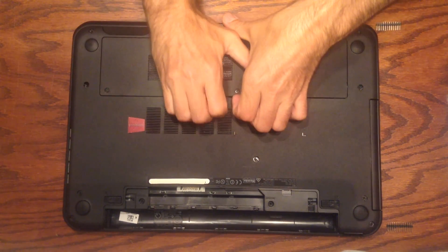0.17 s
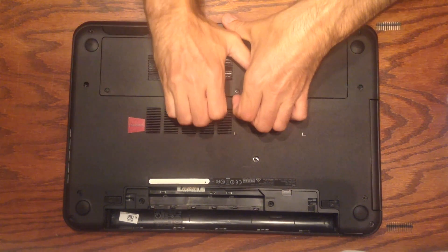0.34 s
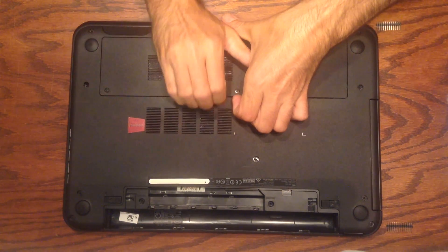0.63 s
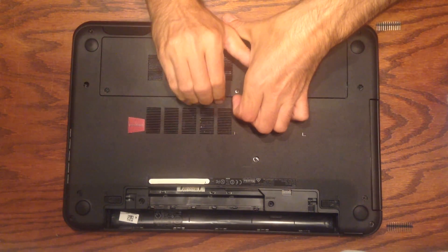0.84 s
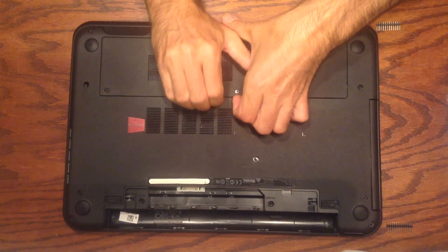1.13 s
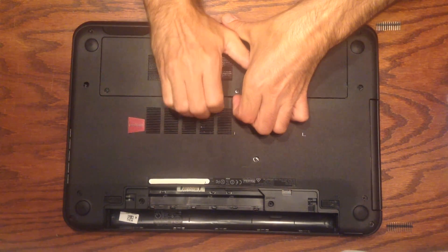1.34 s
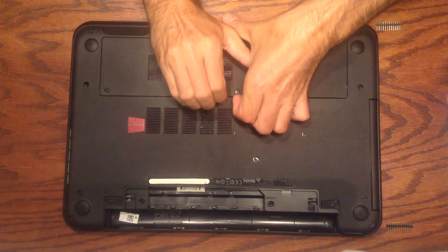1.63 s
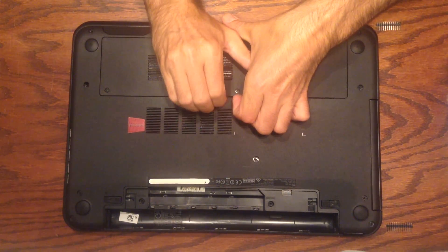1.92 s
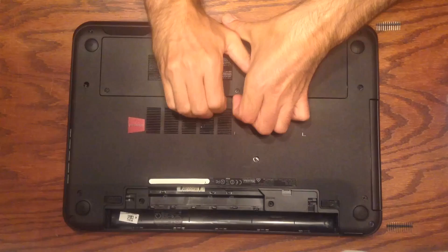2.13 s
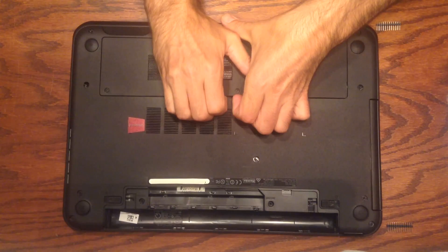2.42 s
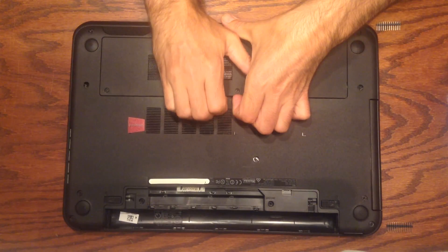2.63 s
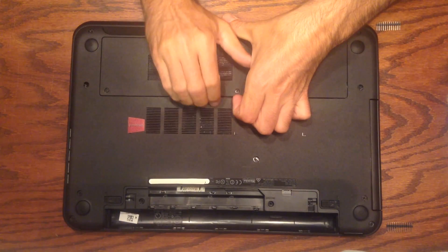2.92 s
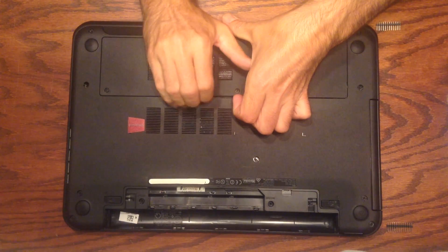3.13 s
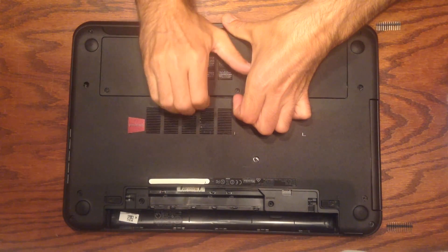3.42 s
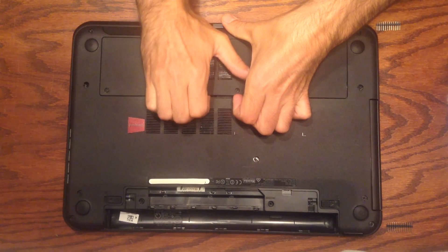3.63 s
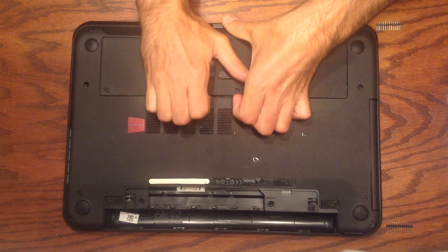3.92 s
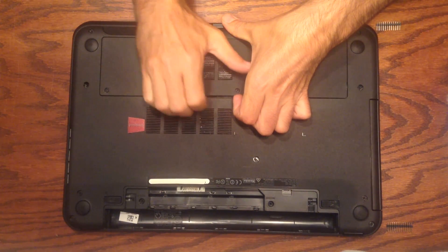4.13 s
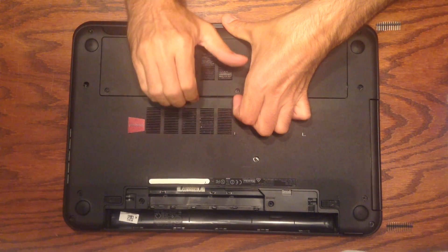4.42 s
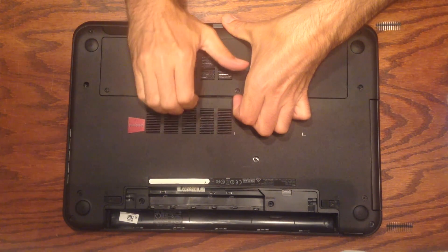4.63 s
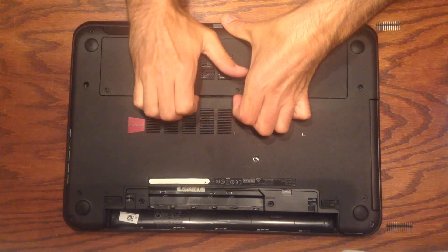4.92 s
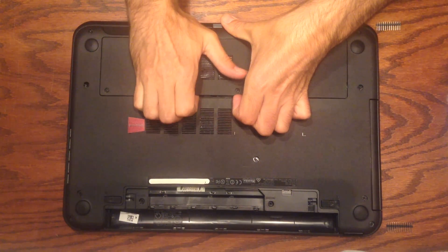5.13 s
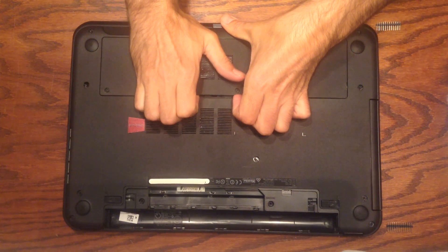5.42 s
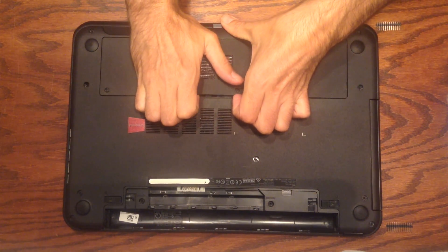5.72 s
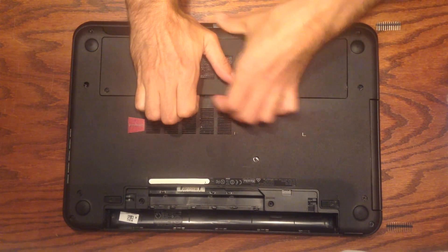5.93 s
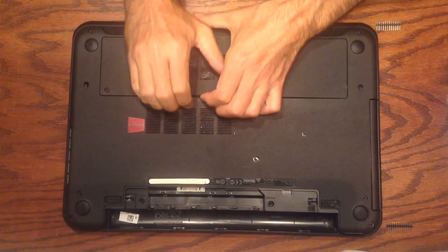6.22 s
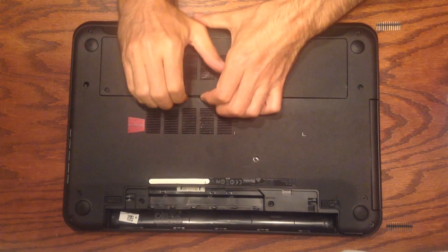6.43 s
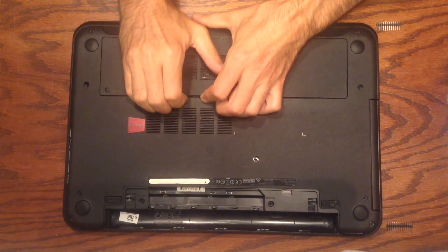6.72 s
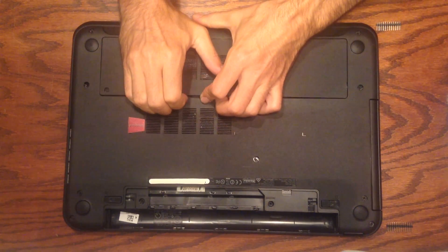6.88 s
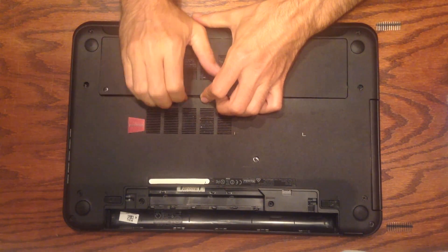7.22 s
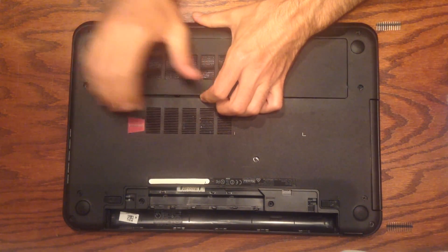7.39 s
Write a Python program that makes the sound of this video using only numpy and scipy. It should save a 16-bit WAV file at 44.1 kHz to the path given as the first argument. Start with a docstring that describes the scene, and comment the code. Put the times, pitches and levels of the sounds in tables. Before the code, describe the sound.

A close microphone in a small quiet room catches fingers prying a plastic panel off a laptop. From 0 to 0.4 s come tiny ticks and soft, buzzing fingertip judders; from 0.5 to 1.9 s, scrapes and light knocks, with a firmer click and tiny squeak at 1.1 s. At 2.25 s a clip snaps with a loud, hollow, rattling pop, a dull rebound and short room echo. Clicks and scratchy strokes follow at 2.7 to 3.5 s, then faint rubs, ticks and a judder around 3.9 to 4.6 s. It is nearly still until about 5.9 s, when scraping resumes, with a clear tick at 6.4 s. A second, brighter snap cracks at 6.84 s; a last knock and faint rub come at 7.2 s. Throughout are faint low-mid room noise, a wavering hum, a thin sinking whine, and a high insect trill with sparse chirps.

```python
"""Prying a plastic panel loose

Fingers pry a plastic service panel off the underside of a laptop on a wooden table in a small room.
Nails tick, squeak and scrape along the seam (filtered bursts and grains); fingertips judder (pulse trains).
Two clips snap loose with sharp pops; after each snap and tick the panel falls back with a knock.
Behind are room noise (coloured noise), a wavering hum, a thin sinking whine (sines) and an insect trill
(a swinging tone with hiss) with a few chirps (swells of noise)."""
import sys
import numpy as np
from scipy import signal
from scipy.fft import rfft, irfft, next_fast_len
from scipy.io import wavfile
from scipy.ndimage import uniform_filter1d

SR = 44100
rng = np.random.default_rng(int(sys.argv[2]) if len(sys.argv) > 2 else 0)


def put_to_file(sound):
    """Save the sound as 16-bit audio at rate SR, in the file named by the first command-line argument."""
    columns = np.atleast_2d(sound).T  # one column per channel
    safe = np.clip(columns, -1, 1)
    whole_steps = np.round(safe * 32767)
    wavfile.write(sys.argv[1], SR, whole_steps.astype(np.int16))


N = 332955
TIME = np.arange(N) / SR   # s

# spectrum of the room noise: (frequency [Hz], level [dB])
ROOM_NOISE_SPECTRUM = [(25, -46.5), (60, -27.5), (100, -13), (150, -1), (230, 1), (330, -5), (500, -6),
                       (800, -8.5), (1200, -12.5), (2000, -19.5), (4000, -22), (8000, -22), (13000, -21.5),
                       (15500, -27)]
# level of the whine before its waver: (time [s], level [dB])
WHINE_LEVEL = [(0, -75.5), (2.8, -79), (3.698, -70.5), (4.702, -79.5), (5.8, -69), (6.7, -73), (7.55, -67)]
# spectrum of the hiss in the insect trill: (frequency [Hz], level [dB])
TRILL_SPECTRUM = [(5000, -40.5), (6400, -18), (6850, -4.5), (7200, -2.5), (7400, -3.5), (7600, 2.5),
                  (7800, -8.5), (8100, -16), (9000, -39.5)]
# high chirps: (time [s], centre frequency [Hz], level [dB])
CHIRP_EVENTS = [(1.46, 6800, -60.5), (2.87, 3830, -68), (2.989, 6600, -61), (4.24, 6900, -60),
                (5.18, 6430, -61), (7.11, 6800, -59.5)]
# finger strokes along the seam:
# (start [s], length [s], scrape level [dB], scrape treble tilt [dB], skin rub level [dB])
STROKES = [(0, 0.038, -57.5, -13, -58.5), (0.478, 0.23, -57, -4.5, -72), (.88, .13, -63.5, -4, -64),
           (1.075, 0.014, -46, -7, -55), (1.301, 0.12, -60, -2.5, -73), (1.516, 0.097, -62.5, -4, -68),
           (1.725, 0.041, -59, -2.5, -71), (1.837, .08, -60, -18, -66.5), (2.705, .05, -65.5, 3, -63),
           (2.764, 0.043, -54, 2, -61), (3.071, 0.015, -59, -2, -77), (3.127, 0.066, -51.5, 0, -66),
           (3.241, 0.079, -55.5, -10, -61), (3.369, 0.18, -65.5, -17.5, -61.5),
           (3.949, 0.057, -71, -4, -68.5), (4.105, 0.101, -61, -3, -65.5), (4.213, 0.039, -52.5, -3.5, -69),
           (4.573, 0.045, -55, -20, -60), (5.866, .15, -58, 4, -64), (6.137, 0.047, -52.5, -1.5, -70.5),
           (6.299, 0.03, -53.5, -0.5, -65), (6.425, 0.088, -58.5, -5, -70), (7.22, 0.11, -69, -11, -71)]
# spectrum of the nail scrape: (frequency [Hz], level [dB])
SCRAPE_SPECTRUM = [(150, -25), (300, -6.5), (550, -2.5), (800, 3.5), (1350, 1.5), (1900, -6.5), (3300, -10),
                   (5000, -13), (8000, -16.5), (15000, -22.5)]
# spectrum of the skin rub: (frequency [Hz], level [dB])
RUB_SPECTRUM = [(30, -24.5), (90, -20.5), (150, 5.5), (220, 0.5), (330, -4.5), (500, -19.5), (900, -37)]
# nails and panel edge knocking on the case:
# (time [s], strength [dB], treble tilt [dB], contact ring [Hz], rebound relative to the tick [dB])
TICK_EVENTS = [(0.041, -29, -8, 1400, -15), (0.057, -25.5, -5, 1220, -11), (0.557, -22, -17, 1460, -9),
               (0.615, -25, -40, 2000, -14), (0.713, -23.5, -18, 1900, -8), (0.924, -24.5, -2, 1190, 1),
               (0.967, -33, -10, 1390, -2), (0.994, -33.5, -18, 1280, -14), (1.038, -25, -19, 1570, -3),
               (1.086, -11.5, -3.5, 2260, -3.5), (1.09, -15, -3, 1560, 2.5), (1.23, -31.5, -30, 895, 4),
               (1.522, -24.5, -46, 1660, -3.5), (1.723, -17.5, -1.5, 1410, -22),
               (1.848, -22.5, -27.5, 1480, -19), (2.25, -6, -4.5, 760, -13), (2.754, -13.5, -4.5, 1150, -4),
               (3.248, -15.5, -4.5, 1150, -11), (3.279, -22, -9, 1720, -5), (3.867, -35, -2, 1440, -6),
               (4.14, -24.5, -28, 1280, 0.5), (4.369, -31, 0, 864, 3), (4.543, -24, -24, 3230, -0.5),
               (4.583, -24.5, -9, 3330, -10), (5.965, -26, -7, 1280, -8), (6.151, -33, -7, 907, -16),
               (6.309, -22.5, -3, 1270, -18), (6.416, -13, -4, 2970, -9.5), (6.603, -25, -16.5, 1250, 0.5),
               (7.184, -28.5, -17, 1090, 4.5), (7.205, -11, -7, 1030, -1.5)]
# spectrum of a knock: (frequency [Hz], level [dB])
KNOCK_SPECTRUM = [(40, -29.5), (100, -17.5), (160, 0.5), (300, 4.5), (500, -2), (800, 2.5), (1300, 3.5),
                  (2100, -2), (3400, -3.5), (4500, -6), (8000, -6.5), (15000, -18.5)]
# fingertips sticking and slipping: (time [s], length [s], mean slip rate [1/s], strength [dB])
JUDDER_EVENTS = [(0.16, 0.1, 122, -7.5), (0.33, 0.046, 179, -9.5), (3.866, 0.04, 130, -10.5),
                 (5.11, 0.035, 130, -23.5), (5.287, 0.05, 132, -24.5)]
# spectrum of the slips: (frequency [Hz], level [dB])
JUDDER_SPECTRUM = [(30, -16), (90, -7.5), (150, 3), (220, -1), (330, -11.5), (500, -20), (900, -37)]
# nails squeaking on the plastic: (time [s], length [s], pitch [Hz], level [dB])
SQUEAK_EVENTS = [(1.079, 0.014, 5400, -48), (3.133, 0.026, 5000, -55), (3.972, 0.026, 5720, -65),
                 (4.574, 0.048, 3260, -62)]
# clips letting go: (time [s], strength [dB], rattle relative to the crack [dB],
# send to the room relative to the strength [dB], rebound relative to the snap [dB])
SNAP_EVENTS = [(2.2475, 8.5, 3, -5.5, -17), (6.8407, 7.5, -4.5, -2.5, -16.5)]
# spectrum of each clip in turn: (frequency [Hz], level [dB])
SNAP_SPECTRA = [
    [(40, -35.5), (100, -28.5), (160, -11.5), (400, -10.5), (540, -7.5), (780, -0.5), (1250, -3),
     (1800, -3), (2250, -1.5), (2900, -7.5), (5000, -8), (8500, -13), (12000, -14), (15500, -17)],
    [(40, -43.5), (100, -42), (160, -12.5), (400, -11), (550, -13), (780, -6.5), (1250, 2), (1850, -2),
     (2700, -1), (5000, -4), (9000, -8), (13000, -10), (15500, -11)],
]
# resonances of the panel: (frequency [Hz], width [Hz], level [dB])
PANEL_MODES = [(156, 16, -1), (210, 12, 6.5), (327, 16, -1.5), (386, 18, 3.5), (590.4, 12, 8),
               (653, 18, -8.5), (760, 56, 4.5), (880, 8.3, -10), (1095, 3.8, -5.5), (1187, 18, -4),
               (1270, 18, 1), (1640, 19, -10.5)]
# decay of the room by 60 dB: (frequency [Hz], decay time [s])
ROOM_DECAY = [(100, .55), (800, 0.45), (2000, 0.46), (5000, 0.44), (12000, 0.39)]

WHINE_HZ, WHINE_HALVING_S = 1093, 18.4   # starting pitch, time for the pitch to fall to half
PRESS_SHARE, LET_GO_S = .25, .03   # share of a stroke spent pressing in; release time after it
HITCH_GAP_S, HITCH_HZ = .04, 1450   # mean gap, middle of the contact ring
HITCH_DB, HITCH_SPREAD_DB = -37, 2.5
TICK_REBOUND_S, TICK_REBOUND_HZ = .009, 220   # delay, contact ring
SNAP_REBOUND_S, SNAP_REBOUND_HZ = .0175, 385
CUTOFF_HZ = 15600


def from_db(db):
    """Logarithmic level: decibels to amplitude gain."""
    return 10 ** (np.asarray(db) / 20)


def rms_one(x):
    """Power normalisation: scale to rms 1."""
    return x / np.sqrt(np.mean(x ** 2) + 1e-20)


def unit_energy(x):
    """Energy normalisation: scale to the energy of a unit click."""
    return x / np.sqrt(np.sum(x ** 2) + 1e-20)


def at_hz(points, hz):
    """Logarithmic pitch scale: read a table on a log-frequency axis."""
    points = np.array(points)
    return np.interp(np.log(np.maximum(hz, 1)), np.log(points[:, 0]), points[:, 1])


def add(track, s, sound):
    """Superposition: mix a sound into a track at a time."""
    start = max(round(s * SR), 0)
    track[..., start:start + sound.shape[-1]] += sound[..., :N - start]


def coloured(x, spectrum):
    """Minimum-phase filtering: a causal response with the given spectrum, by folding its cepstrum."""
    size = 2 * next_fast_len(len(x) // 2 + 1)
    level_db = at_hz(spectrum, np.fft.rfftfreq(size, 1 / SR))
    cepstrum = irfft(np.log(from_db(level_db)))
    cepstrum[1:size // 2] *= 2
    cepstrum[size // 2 + 1:] = 0
    response = np.exp(rfft(cepstrum))
    return irfft(rfft(x, size) * response)[:len(x)]


def tilted(x, thud_db, edge_db):
    """Spectral tilt: raise or lower the bass and the treble."""
    return coloured(x, [(300, thud_db), (700, 0.0059), (3000, 0), (6000, edge_db)])


def evened(x):
    """Spectral whitening: level the broad humps and dips of a short burst."""
    power = uniform_filter1d(np.abs(rfft(x)) ** 2, size=len(x) // 200)
    correction_db = 10 * np.log10(power.mean() / power)
    hz = np.fft.rfftfreq(len(x), 1 / SR)
    return coloured(x, np.column_stack([hz, correction_db])[1:])


def noise(spectrum):
    """Stationary random noise of the given spectrum and rms 1."""
    return rms_one(coloured(rng.standard_normal(N), spectrum))


def drift(rate):
    """Slow random modulation of rms 1, with a new value drawn rate times a second."""
    return rms_one(np.interp(TIME * rate, np.arange(N), rng.standard_normal(N)))


def resonate(x, hz, width_hz):
    """Damped resonance: a two-pole filter with gain 1 at its peak."""
    r = np.exp(-np.pi * width_hz / SR)
    zeros = np.array([1, 0, -1]) * (1 - r * r) / 2
    poles = [1, -2 * r * np.cos(2 * np.pi * hz / SR), r * r]
    return signal.lfilter(zeros, poles, np.asarray(x) + 1e-18)


def blow(crack_t60, rattle_t60, rattle_db, click_db, travel_s, size=8192):
    """Impact and dispersion: click, crack and longer shell rattle; bending waves bring the treble first."""
    t, hz = TIME[:size], np.fft.rfftfreq(size, 1 / SR)
    crack = unit_energy(rng.standard_normal(size) * from_db(-60 * t / crack_t60))
    rattle = unit_energy(rng.standard_normal(size) * from_db(-60 * t / rattle_t60))
    wave = evened(from_db(click_db) * (t == 0) + crack) + from_db(rattle_db) * rattle
    lag = 4 * np.pi * travel_s * np.sqrt(1000 * hz)   # phase; the delay at 1 kHz is travel_s
    return irfft(rfft(wave) * np.exp(-1j * lag))


def knock(db, thud_db, edge_db, hz, ring_db=9, ring_width=.17, overtone=2.1, overtone_db=3.0, room_db=-9):
    """Contact resonance: a small blow with ring, overtone, thud and edge; rows: direct, sent to the room."""
    tick = blow(crack_t60=0.022, rattle_t60=.05, rattle_db=-5, click_db=-6, travel_s=.0006, size=4096)
    click = from_db(room_db) * (TIME[:len(tick)] == 0)
    waves = [tilted(coloured(wave, KNOCK_SPECTRUM), thud_db, edge_db) for wave in (unit_energy(tick), click)]
    width_hz = ring_width * hz
    ring = from_db(ring_db) * resonate(waves, hz, width_hz)
    upper_ring = from_db(overtone_db) * resonate(waves, overtone * hz, width_hz)
    return from_db(db) * (waves + (ring + upper_ring))


def room_noise():
    """Broadband noise: a steady, faint background strongest in the low mids."""
    return from_db(-66.5) * noise(ROOM_NOISE_SPECTRUM)


def hum(hum_hz=318, hum_db=-80, waver_db=3):
    """Frequency and amplitude modulation: a faint sine wavering at random in pitch and level."""
    phase = 2 * np.pi * np.cumsum(hum_hz * (1 + 0.0093 * drift(25))) / SR
    return np.sin(phase) * from_db(hum_db + waver_db * drift(12))


def whine(waver_db=3):
    """Frequency glide: a distant wavering sine sinks ever more slowly while its level comes and goes."""
    s, db = np.transpose(WHINE_LEVEL)
    hz = WHINE_HZ / (1 + TIME / WHINE_HALVING_S)
    phase = 2 * np.pi * np.cumsum(hz * (1 + 0.0066 * drift(25))) / SR
    return np.sin(phase) * from_db(np.interp(TIME, s, db) + waver_db * drift(10))


def insects(pulses_per_s=54.7, sweep_hz=260, tone_db=-72, hiss_db=-68.0, chirp_rise_s=0.036):
    """Modulated tone: a trill swings with each wing stroke, blurred by distance; raspy chirps swell and fade."""
    stroke = 2 * np.pi * np.cumsum(pulses_per_s * (1 + 0.0073 * drift(3))) / SR
    pitch = 7380 + sweep_hz * np.cos(stroke) + 130 * drift(900)   # the fast drift blurs the tone
    tone = (1 + np.sin(stroke)) * np.sin(2 * np.pi * np.cumsum(pitch) / SR)
    out = from_db(tone_db) * tone + from_db(hiss_db) * noise(TRILL_SPECTRUM)
    for s, hz, db in CHIRP_EVENTS:
        age = np.maximum(TIME - s, 0) / chirp_rise_s
        swell = age * np.exp(1 - age)
        rasp = noise([(hz * 0.64, -35), (hz * 0.82, -7), (hz, 0), (hz * 1.2, -5),
                      (hz * 1.23, -26), (hz * 2, -17), (hz * 4.0, -26)])
        out += from_db(db) * swell * rasp
    return out


def slides(grains_per_s=320, spread_db=4, smooth_db=-11):
    """Granular friction: nails catch on the plastic in clicks the shell smears; skin rubs with a dull rumble."""
    out = np.zeros(N)
    age = TIME[:2 ** 14]
    size = len(age)
    for start, length, scrape_db, edge_db, rub_db in STROKES:
        press = np.sqrt(age / (PRESS_SHARE * length))
        release = 1 - (age - length) / LET_GO_S
        pressure = np.clip(np.minimum(press, release), 0, 1)
        strengths = from_db(spread_db * np.minimum(rng.exponential(1, size), 3))
        catches = strengths * rng.choice([-1, 1], size) * (rng.random(size) < grains_per_s / SR)
        shell = blow(crack_t60=.015, rattle_t60=.05, rattle_db=-4, click_db=-6, travel_s=.0006)
        grains = rms_one(signal.fftconvolve(catches, shell)[:size])
        grains += from_db(smooth_db) * rng.standard_normal(size)
        scrape = rms_one(tilted(coloured(grains, SCRAPE_SPECTRUM), 0, edge_db))
        rub = rms_one(coloured(rng.standard_normal(size), RUB_SPECTRUM))
        add(out, start, pressure * (from_db(scrape_db) * scrape + from_db(rub_db) * rub))
    return out


def hitches(thud_db=-8, edge_db=-8, pitch_spread=.15, count=10):
    """Intermittent contact: along a stroke the nail hitches in faint, uneven ticks; rows as in knock."""
    out = np.zeros((2, N))
    for start, length, *_ in STROKES:
        ages = PRESS_SHARE * length + HITCH_GAP_S * (np.arange(count) + rng.random(count))
        strengths = rng.standard_normal(count)
        hz = HITCH_HZ * np.exp(pitch_spread * rng.standard_normal())   # one pitch for each stroke
        hitch = knock(HITCH_DB, thud_db, edge_db, hz)
        for age, strength in zip(ages[ages < length], strengths):
            add(out, start + age, from_db(HITCH_SPREAD_DB * strength) * hitch)
    return out


def ticks(thud_db=-7):
    """Impact excitation: nails and the panel edge knock on the case; rows as in knock."""
    out = np.zeros((2, N))
    for s, db, edge_db, hz, _ in TICK_EVENTS:
        add(out, s, knock(db, thud_db, edge_db, hz))
    return out


def rebounds(thud_db=0, edge_db=-15, ring_db=7, ring_width=0.22):
    """Elastic rebound: the bent panel falls back dully, later after a snap than a tick; rows as in knock."""
    out = np.zeros((2, N))
    after_snap = (SNAP_EVENTS, SNAP_REBOUND_S, SNAP_REBOUND_HZ)
    after_tick = (TICK_EVENTS, TICK_REBOUND_S, TICK_REBOUND_HZ)
    for table, delay_s, hz in (after_snap, after_tick):
        for s, db, *_, rebound_db in table:
            add(out, s + delay_s, knock(db + rebound_db, thud_db, edge_db, hz, ring_db, ring_width))
    return out


def judders(jitter=0.069):
    """Stick-slip friction: a fingertip dragged over the case slips in soft, nearly regular pulses."""
    out, unevenness = np.zeros(N), drift(120)
    for s, length, per_s, db in JUDDER_EVENTS:
        cycles = np.cumsum(per_s * (1 + jitter * unevenness)) / SR
        slips = np.diff(np.floor(cycles), prepend=0)   # one click for each whole cycle
        out += slips * ((TIME > s) & (TIME < s + length)) * from_db(db)
    return coloured(out, JUDDER_SPECTRUM)


def squeaks(width_hz=220):
    """Rapid stick-slip: a nail briefly sings, heard as noise through a narrow resonance."""
    out = np.zeros(N)
    for s, length, hz, db in SQUEAK_EVENTS:
        size = int(length * SR)
        song = rms_one(resonate(rng.standard_normal(size), hz, width_hz))
        add(out, s, from_db(db) * np.hanning(size) * song)
    return out


def snaps(click_db=1, tip_db=-9):
    """Sudden release of strain: each clip springs free and kicks the panel; rows: direct, sent to the room."""
    direct, sent = np.zeros(N), np.zeros(N)
    for (s, db, rattle_db, room_db, _), spectrum in zip(SNAP_EVENTS, SNAP_SPECTRA):
        pop = blow(crack_t60=0.0041, rattle_t60=0.11, rattle_db=rattle_db, click_db=click_db, travel_s=.0008)
        t = TIME[:len(pop)]
        click = 1.0 * (t == 0)
        burst = rng.standard_normal(len(pop)) * from_db(-60 * t / .006)
        tip = unit_energy(resonate(burst, 18000, 5000))   # the tiny catch itself
        body = unit_energy(coloured(pop, spectrum))
        add(direct, s, from_db(db) * (body + from_db(tip_db) * tip))
        add(sent, s, from_db(db + room_db) * unit_energy(coloured(click, spectrum)))
    return np.array([direct, sent])


def panel(x):
    """Modal resonance: whatever touches the panel also sets its resonances ringing."""
    return x + sum(from_db(db) * resonate(x, hz, width) for hz, width, db in PANEL_MODES)


def room(x, build_s=0.0026, size=40000):
    """Diffuse reverberation: echoes build up quickly and decay at a rate set by frequency."""
    t, hz = TIME[:size], np.fft.rfftfreq(size, 1 / SR)
    white = rfft(rng.standard_normal(size))
    centres = [row[0] for row in ROOM_DECAY]
    tail = 0
    for share, (_, t60) in zip(np.eye(len(centres)), ROOM_DECAY):
        band = irfft(white * at_hz(list(zip(centres, share)), hz))   # overlapping triangular bands
        tail = tail + band * from_db(-60 * t / t60)
    echoes = unit_energy(tail * (1 - np.exp(-t / build_s)))
    return signal.fftconvolve(x, echoes)[:N]


def scene():
    """Superposition of sources: pops and handling ring the panel and the room, over the background."""
    knocks, sent = snaps() + ticks() + rebounds() + hitches()
    rubbing = slides() + judders() + squeaks()
    echoes = room(sent + from_db(-7.5) * rubbing)
    handling = panel(knocks + rubbing + echoes)
    background = whine() + hum() + room_noise()
    return (handling + insects() + background)[None]


def record(dry, top=0.73):
    """Saturation and band limiting: the loudest peaks are rounded and the top of the spectrum is cut."""
    steep = signal.ellip(10, .1, 80, CUTOFF_HZ, fs=SR, output="sos")
    return signal.sosfilt(steep, top * np.tanh(dry / top))


dry = scene()
out = record(dry)
put_to_file(out)
```